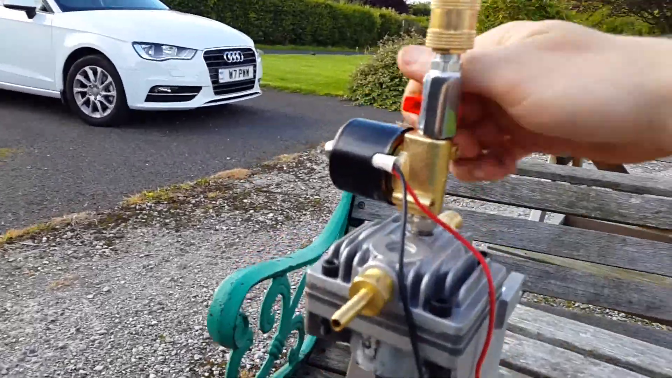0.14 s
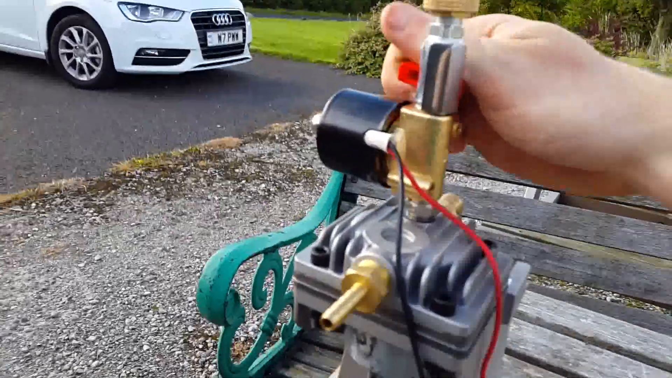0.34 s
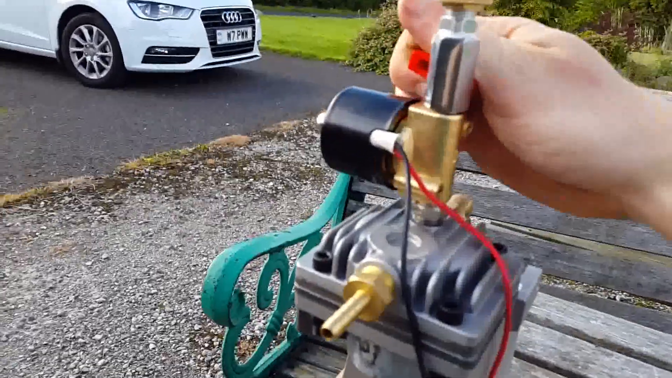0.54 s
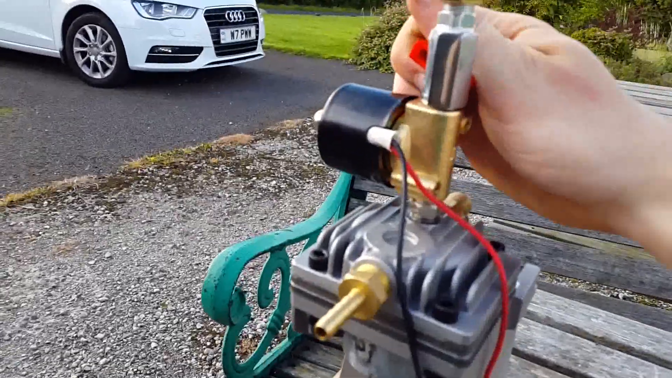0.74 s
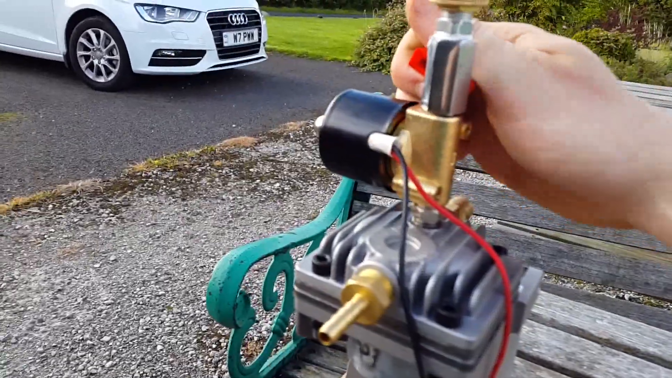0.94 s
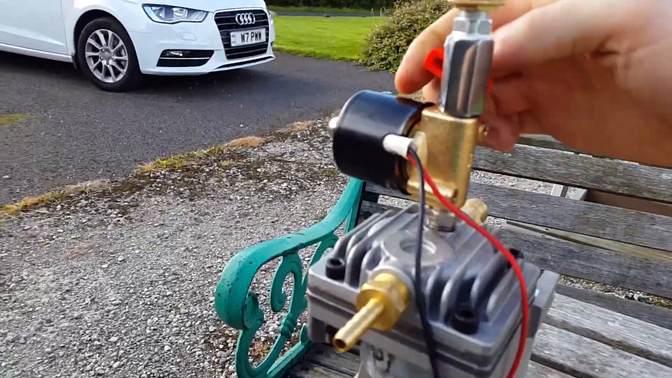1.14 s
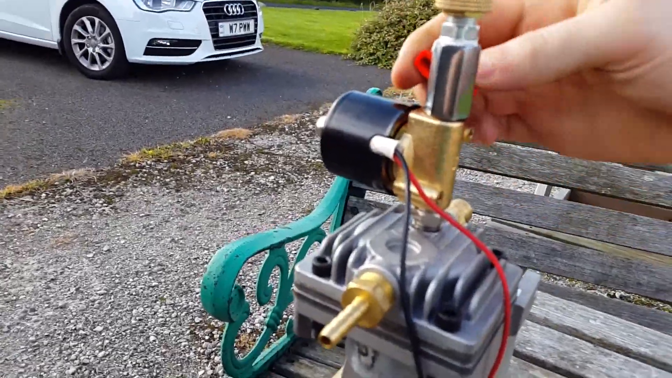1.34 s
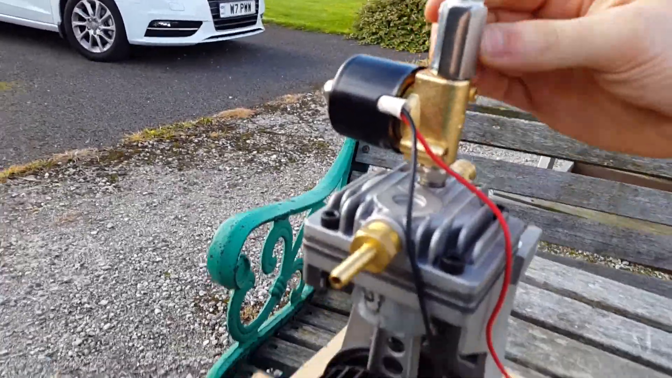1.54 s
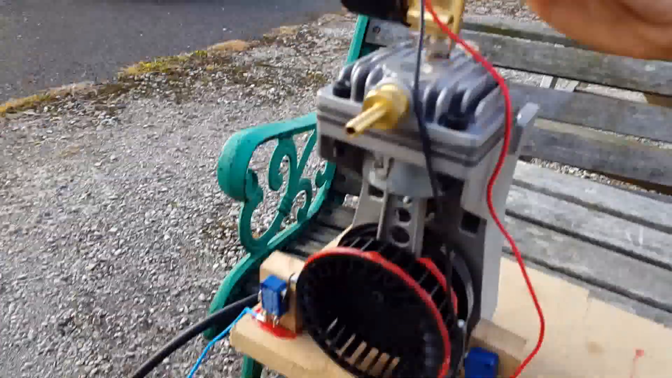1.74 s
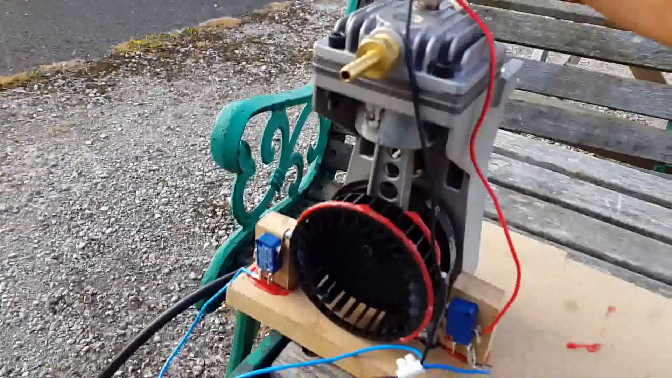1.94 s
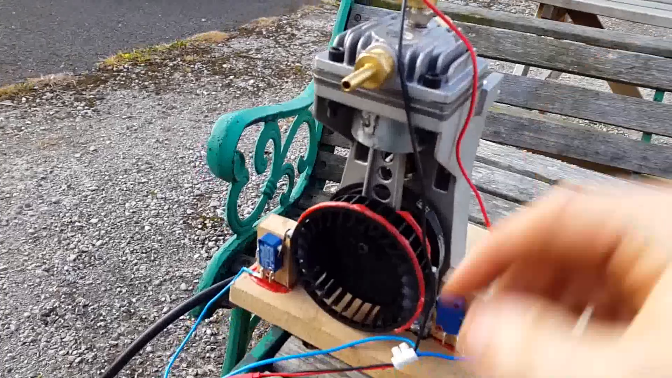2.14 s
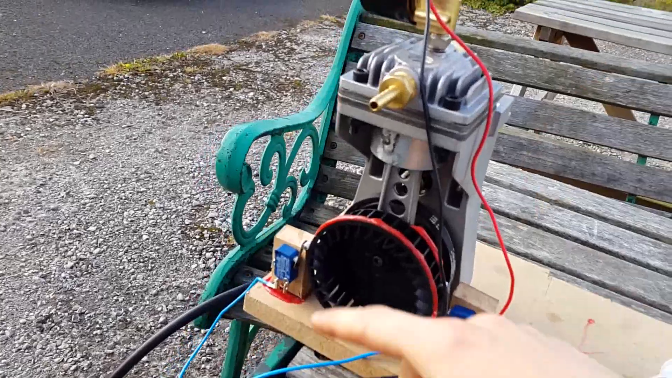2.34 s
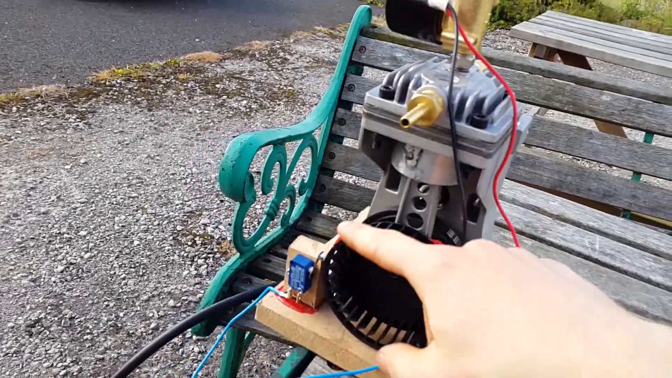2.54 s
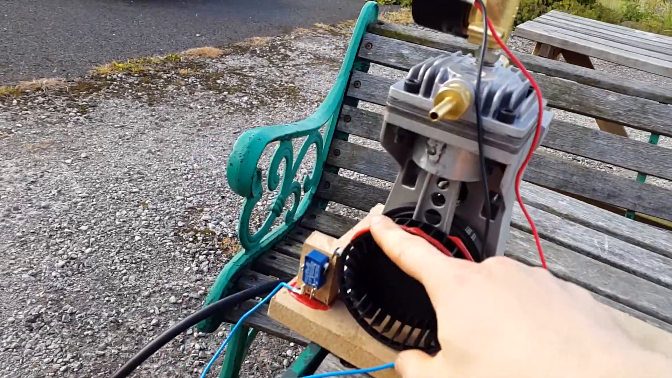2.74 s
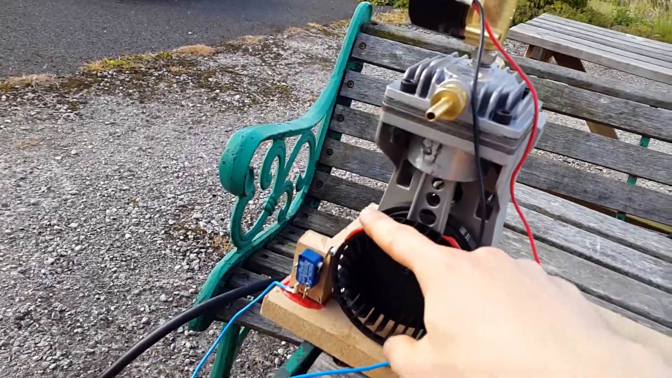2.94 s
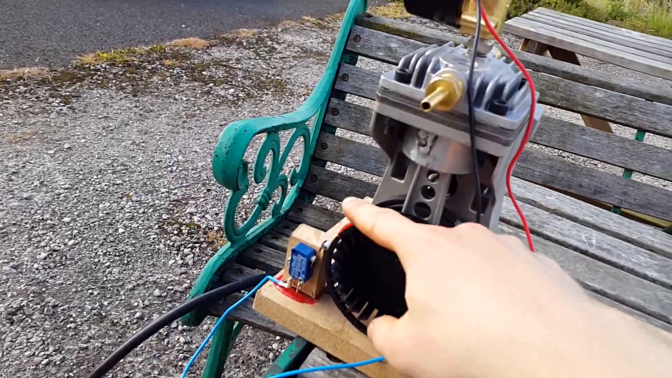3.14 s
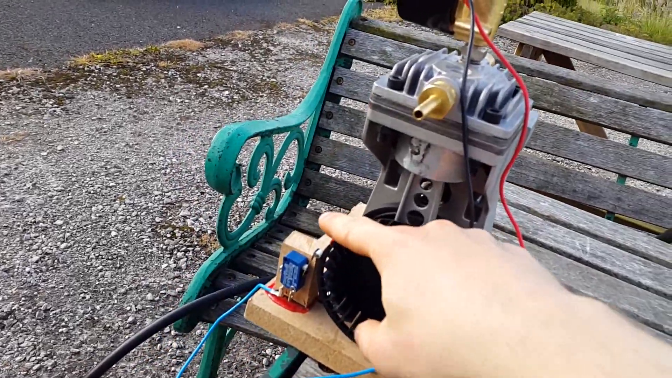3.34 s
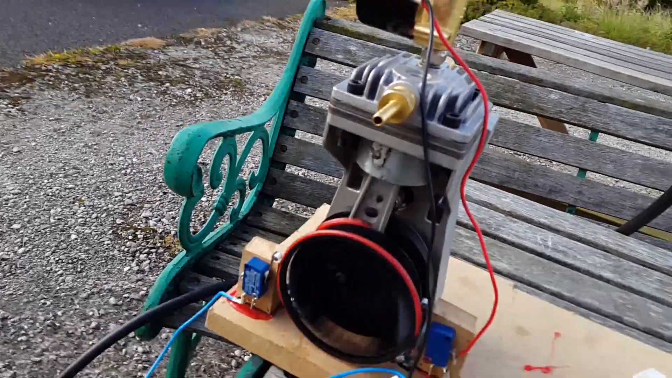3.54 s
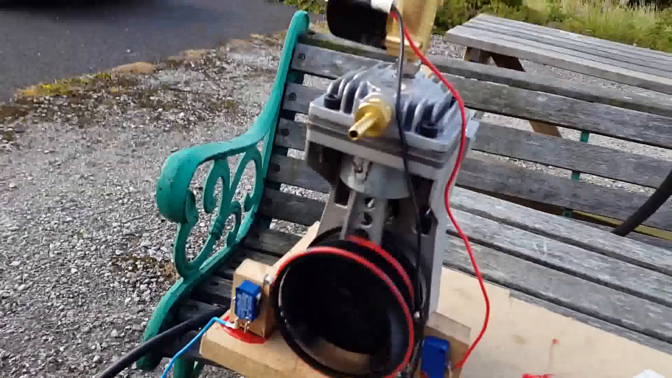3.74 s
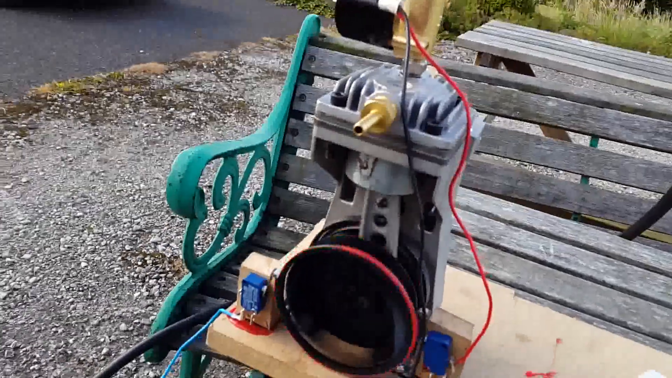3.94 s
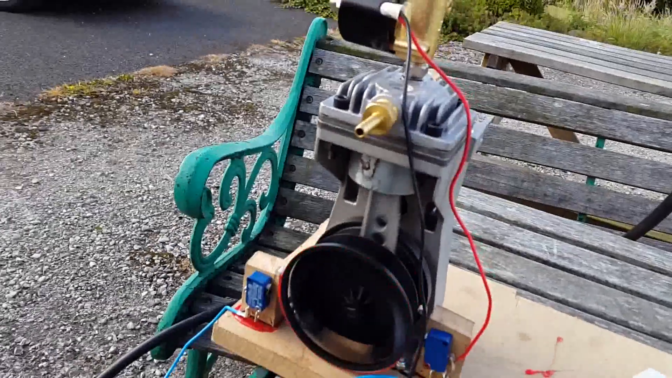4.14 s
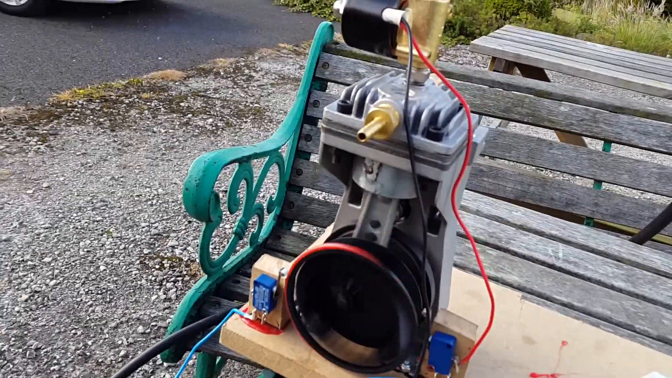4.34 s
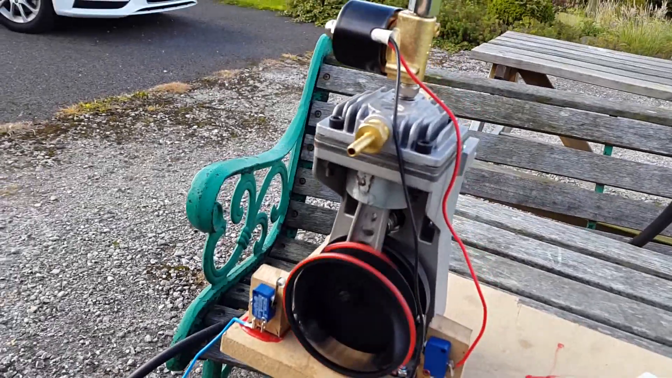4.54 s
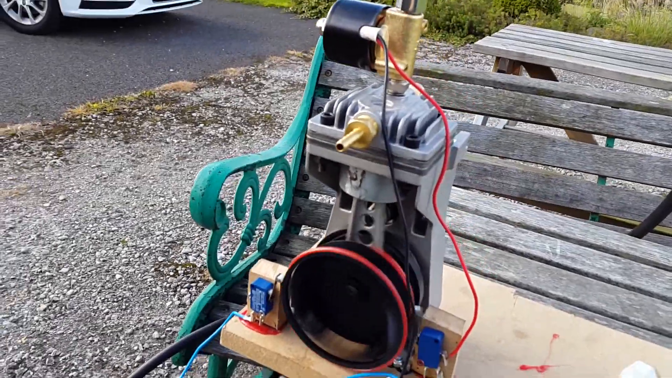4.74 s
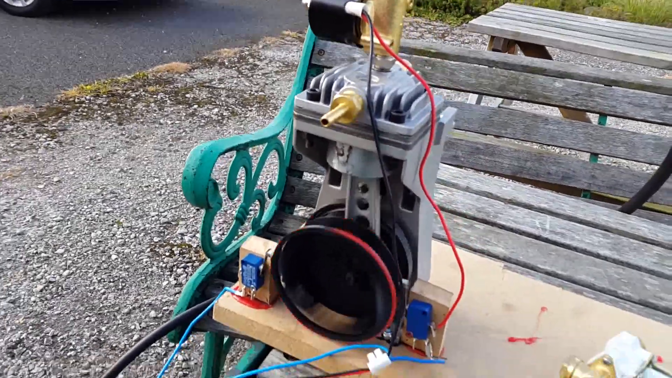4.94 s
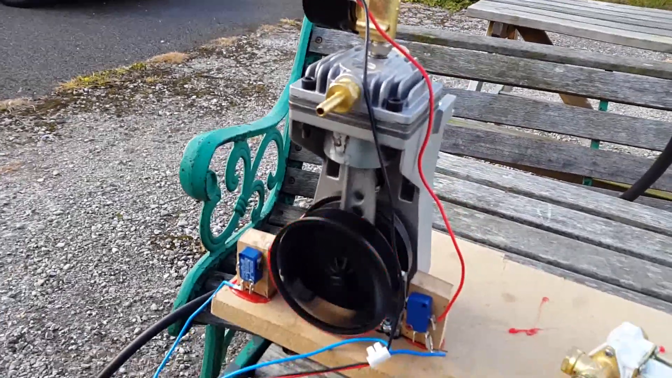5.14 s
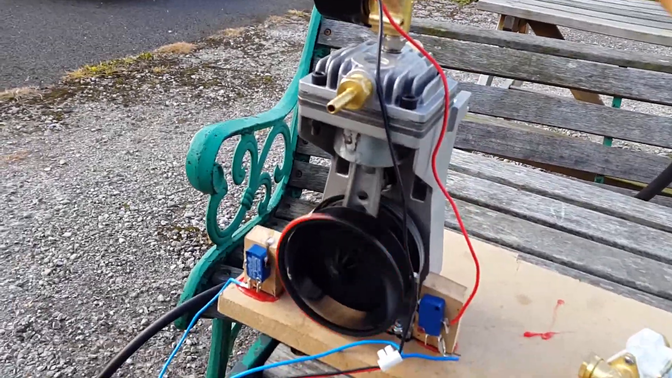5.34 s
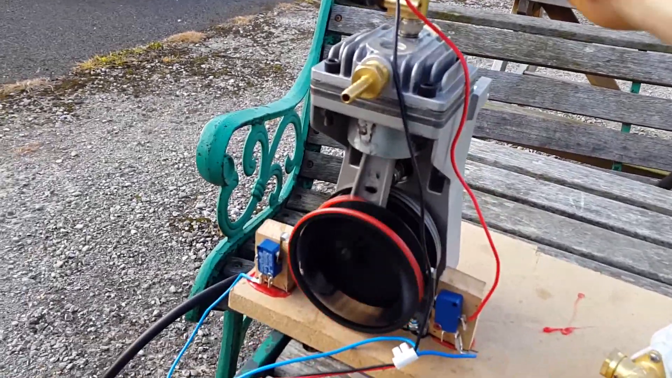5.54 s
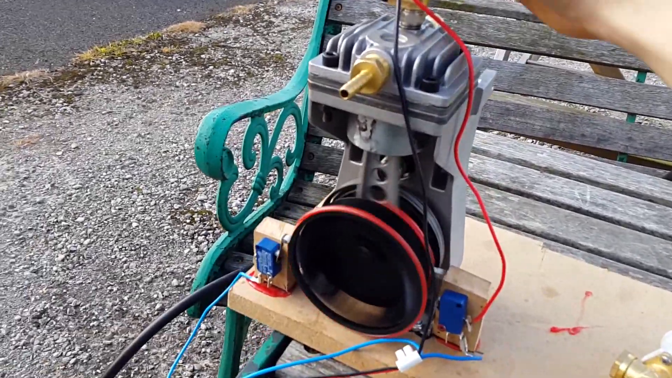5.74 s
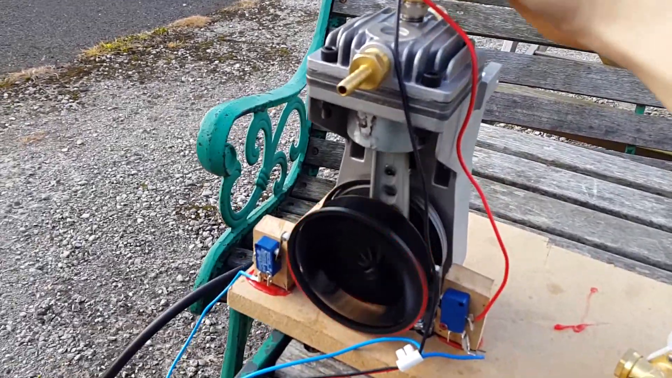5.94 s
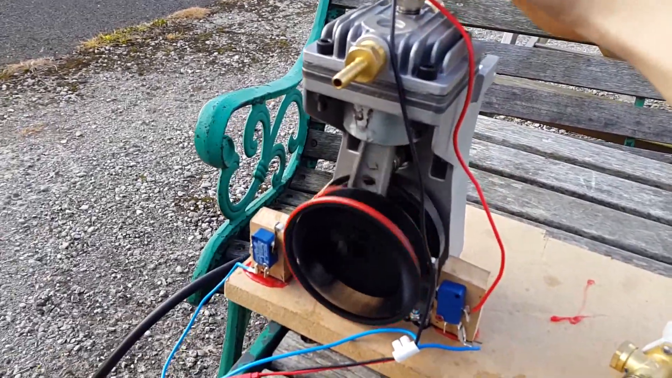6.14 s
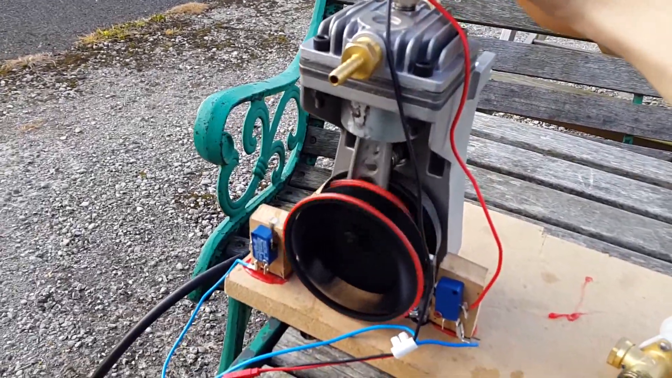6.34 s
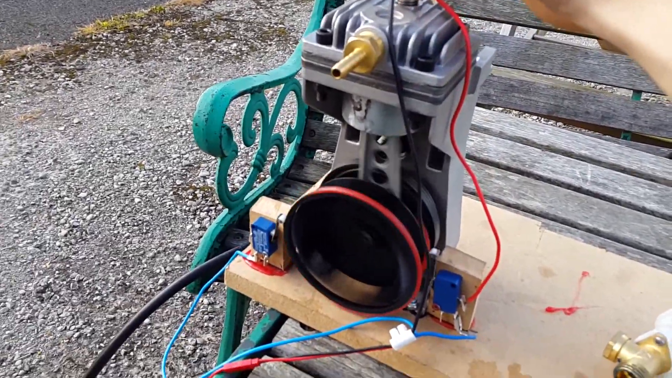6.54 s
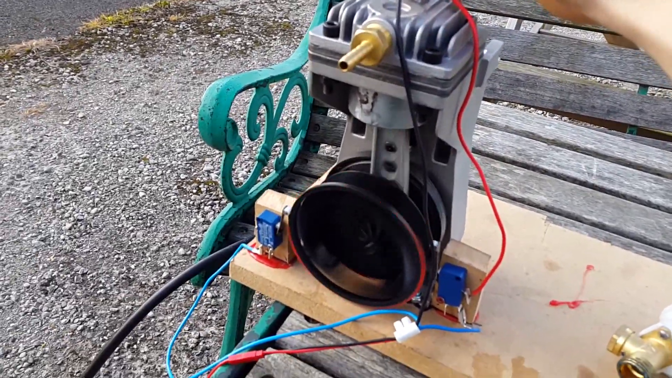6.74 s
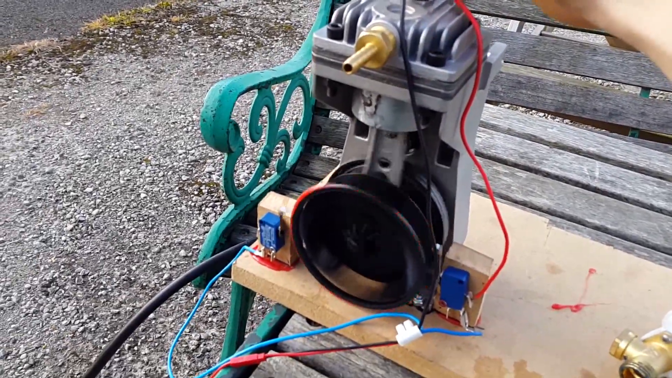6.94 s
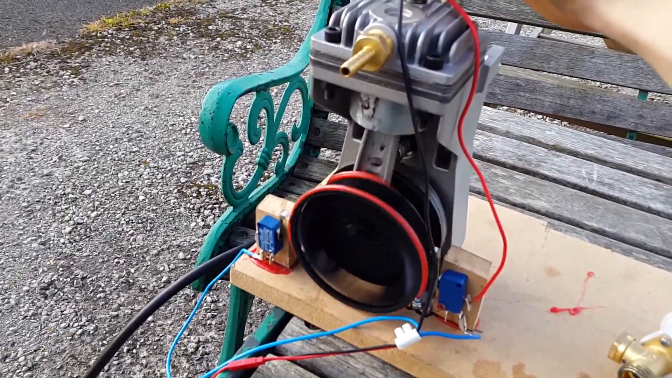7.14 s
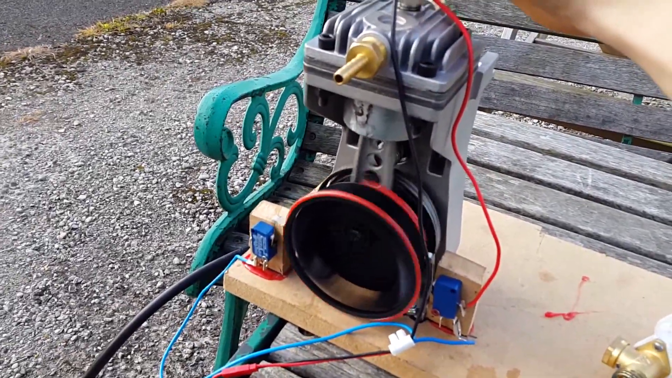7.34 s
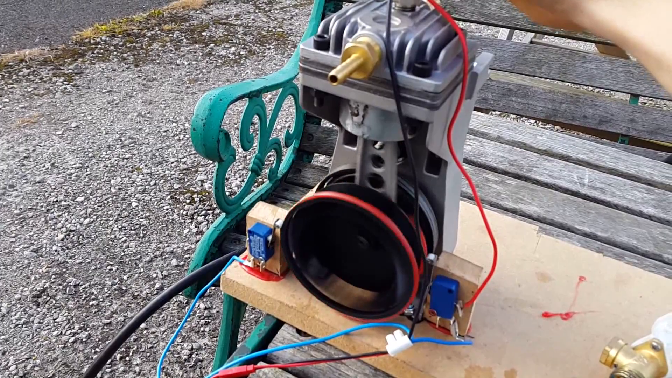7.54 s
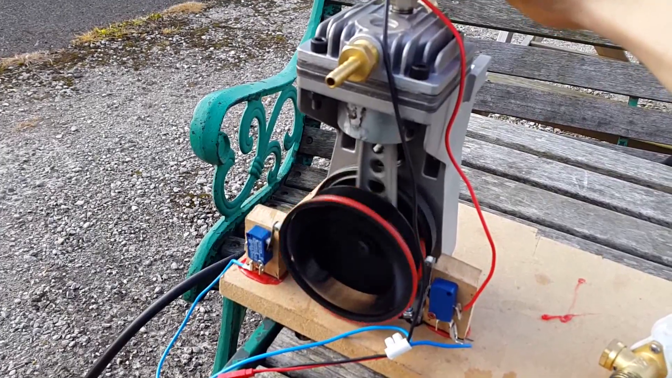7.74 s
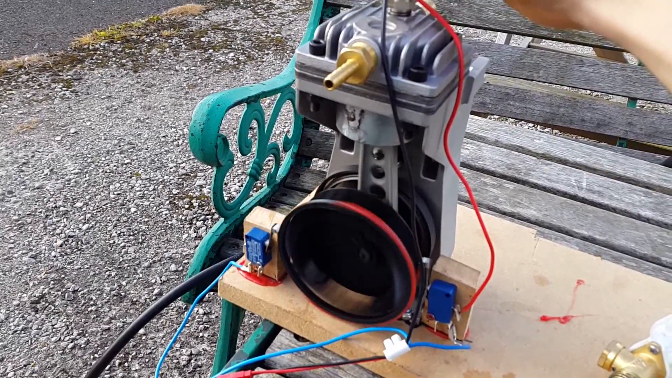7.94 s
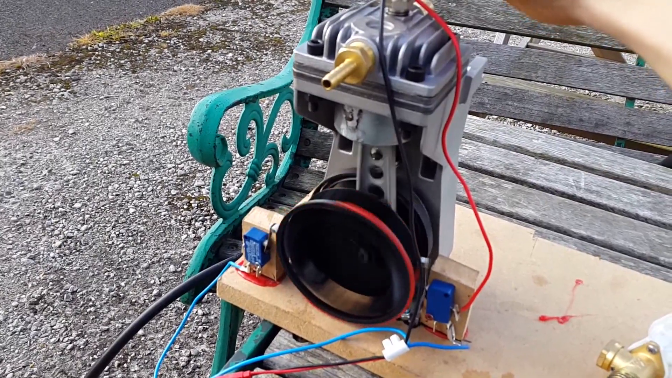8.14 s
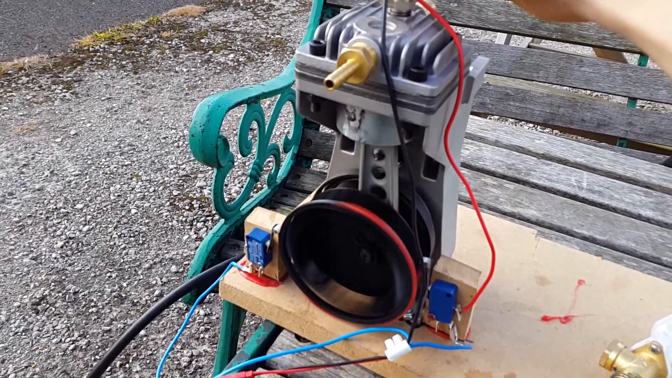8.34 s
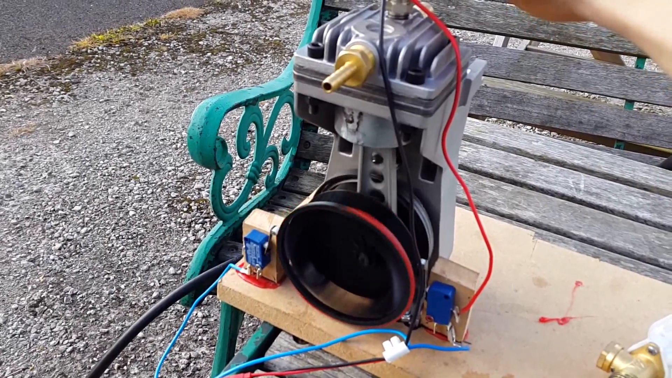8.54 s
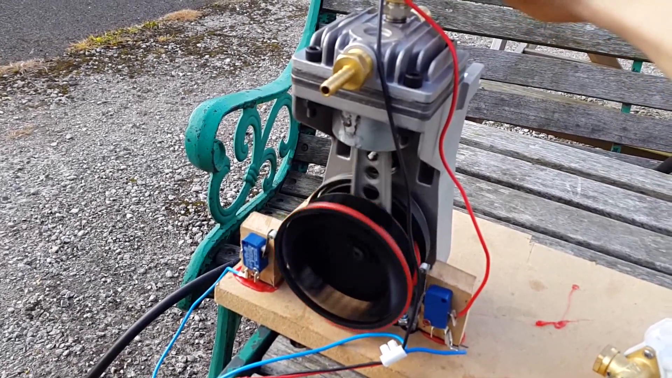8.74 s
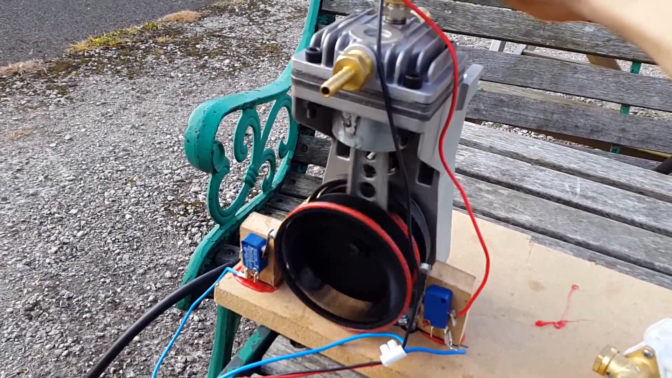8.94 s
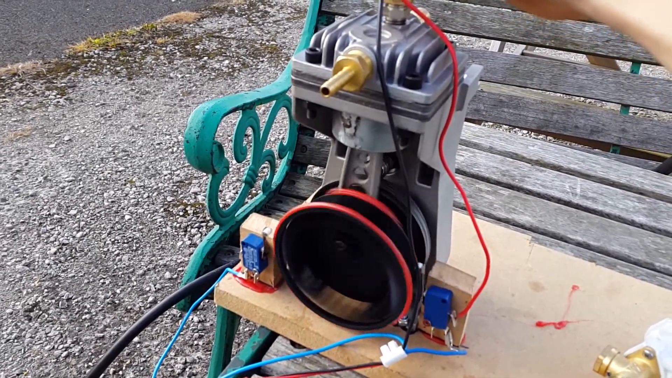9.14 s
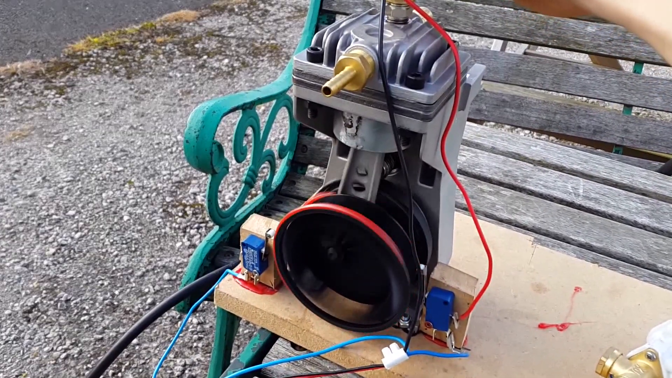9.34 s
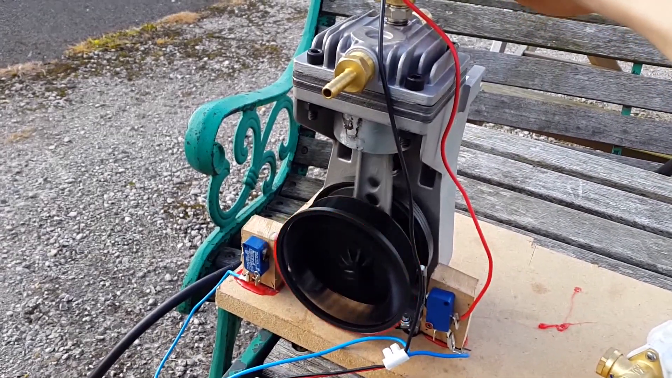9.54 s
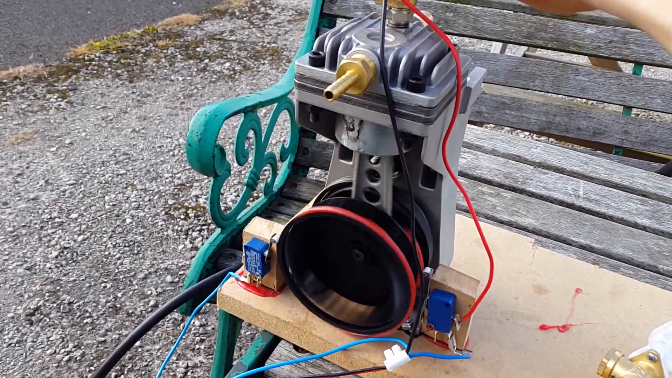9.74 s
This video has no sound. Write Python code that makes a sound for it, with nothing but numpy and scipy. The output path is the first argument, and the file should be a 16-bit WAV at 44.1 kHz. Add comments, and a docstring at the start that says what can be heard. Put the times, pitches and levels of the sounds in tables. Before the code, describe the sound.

In a quiet garden, a small tap ticks and pressurised air starts hissing from fittings, close and bright, while low wind gusts thump the microphone. The hiss turns thinner as the microphone draws back. Then a small air engine starts abruptly, firing about eleven sharp air blasts a second, each with a valve click, a knock and loose metallic rattle, and runs to the end.

```python
"""Air hisses from a leak while wind buffets the microphone; then a compressed-air engine clatters on a garden bench.
The tap ticks and opens onto coloured noise with moving echoes; later the flywheel is pushed and the engine runs.
In every turn a solenoid valve clicks open (ringing modes), air blasts out (shaped noise and a pipe tone),
the plunger drops back and knocks, and the loose crank rattles (modes and noise bursts).
Wind is low noise in lumps and short gusts; a quiet garden lies behind."""
import sys
import numpy as np
from scipy import signal
from scipy.fft import rfft, irfft
from scipy.io import wavfile

SR = 44100
rng = np.random.default_rng(int(sys.argv[2]) if len(sys.argv) > 2 else 0)


def dump(signal):
    """Clip the signal to [-1, 1] and save it as 16-bit WAV at the path in sys.argv[1]."""
    limited = np.clip(np.atleast_2d(signal).T, -1, 1)
    pcm = np.round(limited * 32767).astype(np.int16)
    wavfile.write(sys.argv[1], SR, pcm)


N = 436590
TIME = np.arange(N) / SR
AGE = np.arange(6000) / SR  # s since the start of a single event

# All table levels are relative; mix gains come on top.
# air blast spectrum: f/Hz, left/dB, right/dB
BLAST_COLOUR = [(132, -3, -7), (372, -23, -22.5), (610, -28, -29), (1340, -16.5, -41), (2060, -11.5, -25),
                (2700, -15.5, -24), (3700, -17.5, -22), (4900, -22, -16.5), (6180, -14.5, -16),
                (7460, -7.5, -22.5), (9680, -22, -23), (11370, -9, -29), (15700, -16, -28)]
# dull mechanical rattle spectrum: f/Hz, left/dB, right/dB
RATTLE_COLOUR = [(40, -23, -41), (112, -24, -22), (312, -34.5, -32), (560, -35, -40.5), (897, -24, -24),
                 (1440, -22.5, -31.5), (2050, -25.5, -31.5), (2460, -21, -26.5), (3240, -18.5, -25),
                 (4700, -34.5, -27.5), (7150, -50, -33.5), (9050, -33.5, -39.5), (11600, -33.5, -43),
                 (15500, -40, -52)]
# flywheel speed from the push onwards, one valve stroke a turn: t/s, speed/(turns per s)
FLYWHEEL_SPEED = [(3.6433, 13.753), (3.78, 10.345), (4.04, 11.474), (4.36, 10.947), (4.77, 11.192),
                  (4.85, 10.635), (5.15, 11.479), (5.4, 10.649), (5.88, 11.06), (5.96, 11.898),
                  (6.32, 11.787), (6.4, 10.727), (6.88, 11.476), (6.96, 10.851), (7.3, 11.478),
                  (7.48, 10.312), (7.56, 10.989), (7.92, 10.025), (8.0, 10.645), (8.21, 10.034),
                  (8.76, 10.037), (8.84, 9.277), (9.13, 9.771), (9.28, 8.713), (9.4, 9.366), (9.9, 8.169)]
PUSH_S = FLYWHEEL_SPEED[0][0]
USUAL_KNOCK_S = .0268  # from valve opening to knock in a usual turn


def valve():
    """The solenoid snaps open with a thump; its plunger drops onto the seat, knocks, and shakes the base board."""
    # solenoid strength: t/s, opening click/dB, plunger drop/dB
    solenoid = [(3.64, 6, -0.5), (3.9, 1, 1), (4.02, -.5, -4.5), (4.53, 1.5, -3.5), (4.75, 0.5, -0.5),
                (5.7, 4, 2), (6.25, 1.5, 0.5), (7.7, 4.5, 1.4), (9.9, 3, 1)]
    # modes: f/Hz, level/dB, t60/s, left over right/dB
    open_modes = [(1666, -16.5, 0.016, 4.5), (2450, -27, 0.022, 1)]
    shut_modes = [(890, -47, 0.04, 1), (899.5, -26.5, 0.052, 6), (994, -17, 0.047, 2.5),
                  (1207, -26, 0.036, -1), (1520, -47, 0.024, 2.3333), (1760, -45, 0.032, 3),
                  (2740, -48, 0.02, -3)]
    knock_modes = [(1003, -31, 0.029, 7), (2680, -40, 0.031, 6), (3220, -25, 0.016, 14.5),
                   (3340, -22.5, .012, 13)]
    board_modes = [(104, -35, 0.051, 0), (169, -27, 0.028, 0), (423, -24, 0.093, -2),
                   (479, -29.5, 0.089, -0.81), (1004, -35, 0.22, -2)]
    click_scatter_db, drop_scatter_db = 1.5, 0.43
    knock_scatter_db, knock_scatter_s = 2.2, .0006
    knock_offset_db, knock_db_per_s = -.5, 114  # the later the knock, the harder

    out, bright, dull = np.zeros((3, 2, N))
    for start_s, _, knock_delay_s in strokes():
        chance = rng.standard_normal(4)
        click_db, drop_db = curve(solenoid, start_s) + chance[:2] * [click_scatter_db, drop_scatter_db]
        knock_db = drop_db + knock_offset_db + knock_db_per_s * (knock_delay_s - USUAL_KNOCK_S)
        knock_db += knock_scatter_db * chance[2]
        knock_delay_s = knock_delay_s + knock_scatter_s * chance[3]

        add(out, start_s - .003, puff(db=-25.5, width_s=0.000722))
        add(out, start_s + 0.00017, amp(click_db) * ring(open_modes, detune=0.043, rise_s=0.00086))
        add(bright, start_s, burst(db=click_db + 2, decay_s=0.0018))

        drop_s = start_s + .75 * knock_delay_s
        add(out, drop_s, amp(drop_db) * ring(shut_modes, detune=0.017, rise_s=0.0019))
        add(out, drop_s + 0.00204, amp(drop_db) * ring(board_modes, detune=0.003, rise_s=0.011))
        add(dull, drop_s, burst(db=drop_db + 12, decay_s=0.0032))
        add(bright, drop_s, burst(db=-7, decay_s=0.0012))

        knock_s = start_s + knock_delay_s - .0004
        add(out, knock_s, amp(knock_db) * ring(knock_modes, detune=0.026, rise_s=0.00049))
        add(dull, knock_s, burst(db=knock_db + 11, decay_s=0.0042))
    return out + bright * noise(BLAST_COLOUR) + dull * noise(RATTLE_COLOUR)


def exhaust():
    """The blast swells while the valve is open, sounds the outlet pipe, and its draught reaches the microphone."""
    # air flow: t/s, level/dB
    flow_db = [(3.64, 0), (3.85, 1.5), (4.1, -1), (4.7, -1), (5.4, 0.5), (5.95, 1.6), (9.5, -0.3),
               (9.63, -3), (9.9, -2.5)]
    # mid-treble rasp coming and going in the blast: t/s, level/dB
    rasp_db = [(3.6, -5), (4.2, -4.5), (4.7, -6.5), (5.05, -1.5), (5.4, -3), (5.9, -17), (7, -10.5),
               (9.9, -14.5)]
    # rasp spectrum: f/Hz, left/dB, right/dB
    rasp_colour = [(1200, -58, -60), (2080, -10, -22.5), (3040, -4, -26), (4260, -13, -9), (5500, -35, -29),
                   (8000, -60, -60)]
    blast_scatter_db, rasp_scatter_db = 1.06, 2.5
    settled_db, start_extra_db, settle_s = -32, 18.5, .45  # draught

    out, flow, rasp = np.zeros((3, 2, N))
    for start_s, length_s, _ in strokes():
        chance = rng.standard_normal(3)
        db = curve(flow_db, start_s)[0] + blast_scatter_db * chance[0]
        opening = np.interp(AGE / length_s, [0, .15, .5, .8, 1.1], [0.17, 0.62, 0.89, 0.92, 0.13], right=0)
        add(flow, start_s, amp(db + 1) * opening)
        turn_rasp_db = db + curve(rasp_db, start_s)[0] + rasp_scatter_db * chance[1]
        add(rasp, start_s, amp(turn_rasp_db) * opening)

        pipe_hz = 1250 * (1 + 0.018 * chance[2])
        pipe = amp(db - 32) * opening * np.sin(2 * np.pi * pipe_hz * AGE)
        add(out, start_s, pipe * amp([[2], [-2]]))

        draught_db = settled_db + start_extra_db * np.exp((PUSH_S - start_s) / settle_s)
        add(out, start_s + 0.01033, puff(db=draught_db, width_s=0.00179) * amp([[3], [-5]]))
    # a small jet radiates little bass
    highpass = signal.butter(2, 230, "highpass", fs=SR, output="sos")
    jet = signal.sosfilt(highpass, noise(BLAST_COLOUR))
    return out + flow * jet + rasp * noise(rasp_colour)


def crank(chatter_per_turn=12):
    """Play in the rod clacks at two places in each turn; small chatter and rubbing fill the rest."""
    # single loud clacks: t/s, level/dB
    clacks = [(3.7763, -20.5), (3.7928, -23), (5.4981, -23), (6.0257, -22), (6.5618, -24), (6.5781, -21),
              (7.1878, -21), (8.7389, -25), (9.2545, -21)]
    # where the rod's play closes: share of the turn, level/dB
    play = [(.63, -26.5), (.82, -27.5)]
    # rattle level as the engine settles: t/s, level/dB
    looseness = [(3.65, 2.5), (4.05, -2), (4.6, -2), (5.1, 0.5), (9.9, 0)]
    # modes: f/Hz, level/dB, t60/s, left over right/dB
    crank_modes = [(972, -12.5, 0.11, 3.6), (1704, -13, 0.072, 12), (2480, 3.5, 0.024, 3),
                   (2670, 4, 0.023, 4.6), (3440, -10, 0.0038, 6)]

    out, rub, ticks = np.zeros((3, 2, N))
    starts, angle = strokes()[:, 0], turns()
    rub_gain = amp([2.5, 2, -0.5, -10.0, -3, -16.5])
    rub += (angle > 0) * np.interp(angle % 1, [0, .3, .45, .7, .85, 1], rub_gain)

    hits = list(clacks)
    for start_s, period_s in zip(starts, np.diff(starts)):
        for share, db in play:
            hit_s = start_s + period_s * (share + 0.0152 * rng.standard_normal())
            hits.append((hit_s, db + 1.9 * rng.standard_normal()))
        chatter_s = start_s + period_s * rng.uniform(.35, .82, chatter_per_turn)
        hits += zip(chatter_s, -35 + 2 * rng.standard_normal(chatter_per_turn))
    for hit_s, db in hits:
        add(out, hit_s, amp(db - 4.5) * ring(crank_modes, detune=0.022, rise_s=0.00075))
        add(rub, hit_s, burst(db=db + 35.5, decay_s=0.001))
        add(ticks, hit_s, burst(db=db + 19.5, decay_s=0.00051))
    rattle = out + amp(-1.5) * rub * noise(RATTLE_COLOUR) + ticks * noise(BLAST_COLOUR)
    return amp(curve(looseness, TIME)[0]) * rattle


def leak():
    """The tap ticks, then air hisses from the fittings, coloured by echoes as the microphone sways and draws back."""
    # hiss as the tap is opened: t/s, level/dB
    leak_db = [(.8, -55), (.87, -10), (.91, -0.5), (2.05, 0.5), (2.4, 3), (3, 2), (9.9, 3.5)]
    # microphone draws back: t/s, 0 near to 1 far
    retreat = [(.9, 0.43), (1.2, .03), (1.8, .08), (2.33, 0.96), (3.3, 1)]
    # levels of narrow hiss, top fizz, and hollow ring under a hand cupped round the tap: t/s, level/dB
    narrow_db = [(.9, -20), (1.25, -5), (1.5, 1.5), (2.1, -5.5), (2.3, -17)]
    fizz_db = [(.9, -8), (1.2, 5), (2.1, -10), (2.75, -17), (2.92, -6)]
    hollow_db = [(.85, -6), (1.05, -1), (1.3, -1), (1.55, -4), (2.1, -8), (2.3, -40)]
    # spectra: f/Hz, left/dB, right/dB
    near_colour = [(500, -44, -42.5), (910, -40.5, -41.5), (1830, -30, -43), (2010, -33.5, -36),
                   (2430, -31, -35), (3280, -39, -37.5), (4500, -42, -35), (5350, -43, -29.5),
                   (6400, -36.5, -35), (7300, -31, -32.5), (8450, -36.5, -37), (11000, -34, -42),
                   (13000, -32, -43), (15500, -35, -39)]
    far_colour = [(513, -53.5, -49), (830, -46.5, -50), (1200, -36, -41.5), (1450, -44, -48),
                  (1770, -37.5, -41.5), (2630, -45, -47.5), (3050, -37.5, -42), (3520, -48.5, -46),
                  (5300, -48.5, -40), (7440, -36.5, -44), (9300, -50, -47.5), (11300, -40.5, -52),
                  (13500, -49, -50), (15500, -48, -48)]
    narrow_colour = [(3500, -70, -70), (4930, -55, -29), (5600, -40, -26), (6740, -49, -30.5),
                     (8000, -70, -70)]
    fizz_colour = [(9000, -70, -68), (13000, -36, -45), (15500, -40, -44)]
    hollow_colour = [(1300, -65, -65), (1790, -36, -42), (2230, -26, -35), (2500, -25, -27),
                     (2800, -41, -39), (3200, -67, -65)]
    tap_colour = [(300, -34, -37), (900, -33, -33), (1800, -28, -35), (5000, -35, -32), (9000, -47, -48),
                  (15000, -54, -57)]
    near_lag_s, far_lag_s, engine_echo = 0.00062, 0.000705, .2  # reflection off the engine
    bench_lag_s, bench_echo = .00115, .17  # reflection off the bench slats

    far = np.clip(curve(retreat, TIME)[0], 0, 1)
    hiss = np.sqrt(1 - far) * noise(near_colour) + np.sqrt(far) * noise(far_colour)
    parts = (narrow_db, narrow_colour), (fizz_db, fizz_colour), (hollow_db, hollow_colour)
    for level, colour in parts:
        hiss += amp(curve(level, TIME)[0]) * noise(colour)

    drift_s = .00002 * sway()
    engine_lag_s = near_lag_s + far * (far_lag_s - near_lag_s) + drift_s / 2
    echo = engine_echo * delayed(hiss, engine_lag_s)
    echo += bench_echo * delayed(hiss, bench_lag_s + 2 * drift_s)

    tick = np.zeros((2, N))
    add(tick, .257, burst(db=-2.5, decay_s=0.004))
    return amp(curve(leak_db, TIME)[0]) * (hiss + echo) + tick * noise(tap_colour)


def wind():
    """A lumpy breeze on the microphone; sudden buffets reach higher in pitch."""
    # breeze: t/s, level/dB
    breeze_db = [(0, -57.5), (.57, -53), (.87, -40), (.96, -66), (1.08, -49.5), (1.6, -59), (1.98, -46.5),
                 (2.27, -45), (2.4, -64), (3.47, -70), (3.62, -50), (4.5, -52)]
    # single buffets: t/s, level/dB, length/s
    buffet_rows = [(0.513, -48, 0.017), (0.711, -34.5, 0.024), (.8, -35.5, .016), (0.887, -23.5, .011),
                   (1.084, -43.5, .025), (1.343, -42.5, .018), (1.842, -38, 0.021), (1.925, -30, 0.013),
                   (1.979, -32, .026)]
    # spectra: f/Hz, level/dB
    breeze_colour = [(20, -23), (55, 7.5), (120, 8.5), (200, 1.0), (320, -20.0), (600, -28), (2000, -64)]
    buffet_colour = [(20, -34), (70, 3.5), (140, 3.5), (250, -4), (400, -22.0), (700, -36), (2000, -62)]

    breeze = amp(curve(breeze_db, TIME)[0]) * rumble(breeze_colour)
    gusts = sum(amp(db) * np.exp(-(2 * (TIME - s) / length_s) ** 2) for s, db, length_s in buffet_rows)
    buffets = gusts * rumble(buffet_colour)
    lean_db = np.interp(TIME, [2.2, 2.5], [4, 0])  # the breeze comes from the right
    return (breeze + buffets) * amp([-3.0 - lean_db, 2 + lean_db])


def garden():
    """Quiet garden: steady, mostly low noise."""
    # spectrum: f/Hz, left/dB, right/dB
    garden_colour = [(40, -33, -42), (153, -37, -44), (242, -37.5, -43), (394, -48.5, -54),
                     (1130, -48, -40.5), (1550, -52, -58), (3000, -62, -63), (6000, -71, -67.5),
                     (15000, -72, -73)]
    return amp(-5.0) * noise(garden_colour)


def surroundings(x, wet_db, t60_s):
    """Faint scattered echoes from bench, gravel and hedges: sparse random taps that die away."""
    sparse = rng.random((2, len(AGE))) < .05
    taps = rng.standard_normal((2, len(AGE))) * sparse * (AGE > .003)
    taps *= amp(-60 * AGE / t60_s)
    echoes = signal.fftconvolve(x, taps / np.linalg.norm(taps[0]), axes=1)[:, :N]
    return x + amp(wet_db) * echoes


def turns():
    """Turns that the flywheel has made so far: its speed summed from the push onwards."""
    return np.cumsum(curve(FLYWHEEL_SPEED, TIME)[0] * (TIME >= PUSH_S)) / SR


def strokes():
    """Valve timing, one row a turn: start/s, blast length/s, knock delay/s; slow turns lengthen the last two."""
    usual_turn_s, usual_blast_s = .09, .016
    blast_stretch, knock_stretch = 0.13, .39  # shares of the time that a slower turn adds
    first_extra_s = 0.012  # the first stroke, at the push, has a longer blast and a later knock

    angle = turns()
    starts = TIME[np.searchsorted(angle, np.arange(angle[-1]), side="right")]
    slower_s = 1 / curve(FLYWHEEL_SPEED, starts)[0] - usual_turn_s
    extra_s = first_extra_s * (starts == starts[0])
    blast_s = usual_blast_s + blast_stretch * slower_s + extra_s
    knock_s = USUAL_KNOCK_S + knock_stretch * slower_s + extra_s
    return np.transpose([starts, blast_s, knock_s])


def ring(modes, detune, rise_s):
    """One blow on a set of decaying modes, a little different each time."""
    out = np.zeros((2, len(AGE)))
    for hz, db, t60_s, pan_db in modes:
        chance = rng.standard_normal(2)
        decay = amp(db + 0.7 * chance[0] - 60 * AGE / t60_s)
        wave = decay * np.sin(2 * np.pi * hz * (1 + detune * chance[1]) * AGE)
        out += amp([[pan_db / 2], [-pan_db / 2]]) * wave
    return out * (1 - np.exp(-AGE / rise_s))


def burst(db, decay_s):
    """Envelope of a sharp contact."""
    return amp(db) * np.exp(-AGE / decay_s) * (1 - np.exp(-AGE / 0.00014))


def puff(db, width_s):
    """A dip and a swell of air pressure, centred four widths after its start."""
    u = AGE / width_s - 4
    return amp(db) * u * np.exp((1 - u ** 2) / 2)


def noise(colour):
    """Stereo noise of a given colour, partly alike in both ears, its deepest bass thinned."""
    # f/Hz, left-right likeness (0 to 1)
    likeness = [(60, 0.2), (200, 0.96), (500, 0.74), (1200, 0.58), (2500, 0.18), (6000, 0.053),
                (15000, 0.064)]
    hz = np.fft.rfftfreq(N, 1 / SR)
    a, b = rfft(rng.standard_normal((2, N)))
    same = np.clip(spectrum(likeness, hz)[0], 0, 1)
    pair = np.array([a, same * a + np.sqrt(1 - same ** 2) * b])
    return irfft(pair * amp(spectrum(colour, hz)) * hz / np.hypot(hz, 35), N)


def rumble(colour):
    """Low noise of unit level, unrelated at the two microphone ports."""
    gain = amp(spectrum(colour, np.fft.rfftfreq(N, 1 / SR)))
    x = irfft(rfft(rng.standard_normal((2, N))) * gain, N)
    return x / x.std()


def sway(count=8):
    """Slow random wander of about unit size, a sum of slow sines."""
    rates_hz = .7 * np.geomspace(.3, 2, count)
    phases = rng.random(count)
    waves = sum(np.sin(2 * np.pi * (r * TIME + p)) for r, p in zip(rates_hz, phases))
    return waves / np.sqrt(count / 2)


def delayed(x, lag_s):
    """A sound arriving late by a lag that may move."""
    return np.array([np.interp(TIME - lag_s, TIME, side) for side in x])


def amp(db):
    """Decibels to gain."""
    return 10 ** (np.asarray(db) / 20)


def curve(rows, at):
    """Each column of a table, joined by straight lines."""
    x, *columns = np.transpose(rows)
    return np.array([np.interp(at, x, c) for c in columns])


def spectrum(rows, hz):
    """Each column of a table, joined on a log-frequency axis."""
    x, *columns = np.transpose(rows)
    return np.array([np.interp(np.log(hz + 1), np.log(x), c) for c in columns])


def add(mix, start_s, sound):
    """Mixes a sound in at a time, cut off at the end of the mix."""
    part = mix[:, max(round(start_s * SR), 0):][:, :sound.shape[-1]]
    part += sound[..., :part.shape[1]]


def scene():
    """Engine with its echoes, leak, wind and the quiet garden."""
    engine = surroundings(valve() + exhaust() + crank(), wet_db=-15.5, t60_s=0.27)
    return engine + leak() + wind() + garden()


def record(dry):
    """The microphone sheds the deepest bass, the loudest peaks are rounded off; then the band limit."""
    highpass = signal.butter(2, 28, "highpass", fs=SR, output="sos")
    thinned = signal.sosfilt(highpass, dry)
    rounded = thinned / (1 + (thinned / .9) ** 4) ** .25
    lowpass = signal.firwin(511, 15900, window=("kaiser", 8), fs=SR)
    return signal.oaconvolve(rounded, lowpass[None], "same")


dry = scene()
out = record(dry)
dump(out)
```